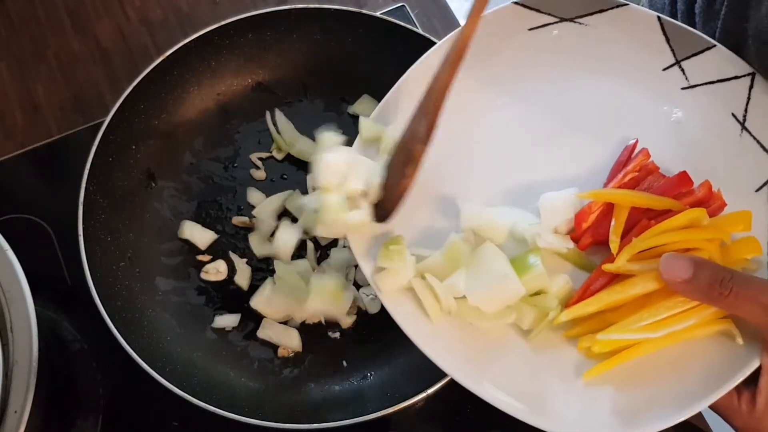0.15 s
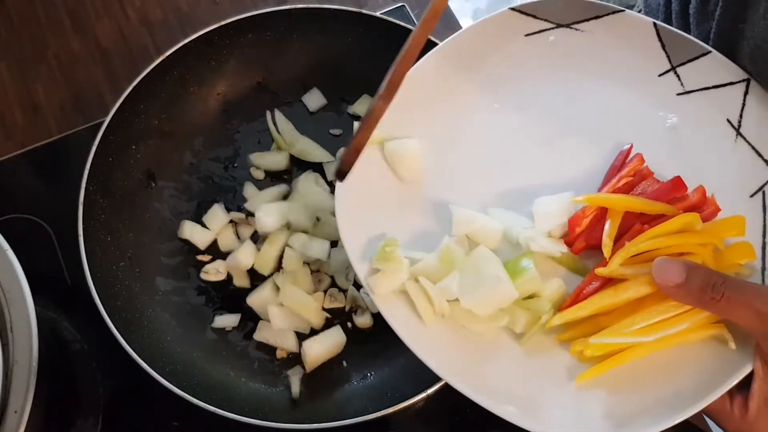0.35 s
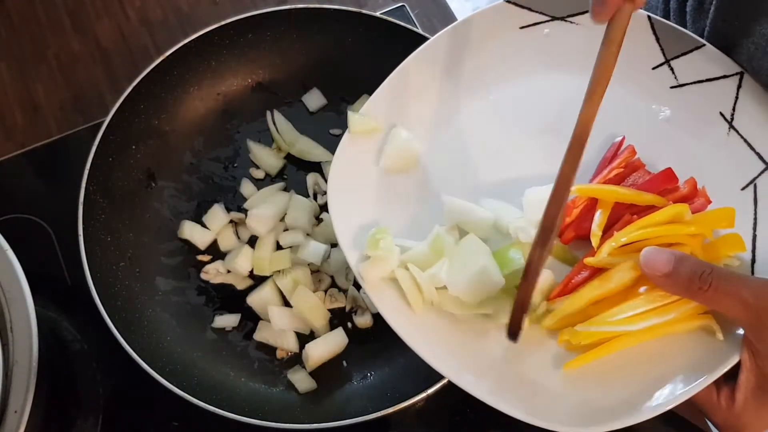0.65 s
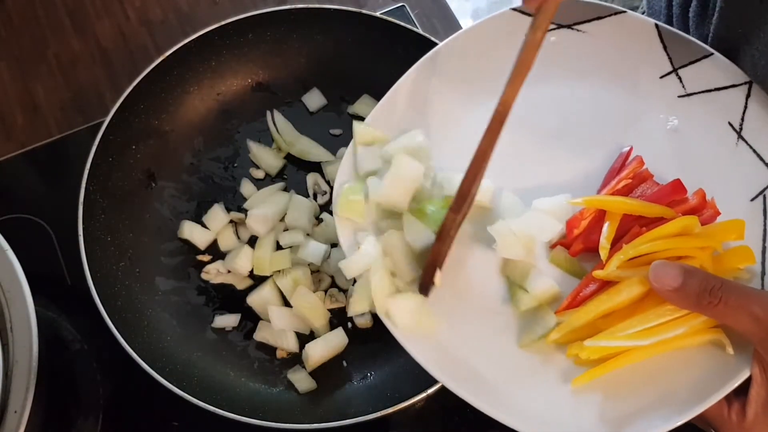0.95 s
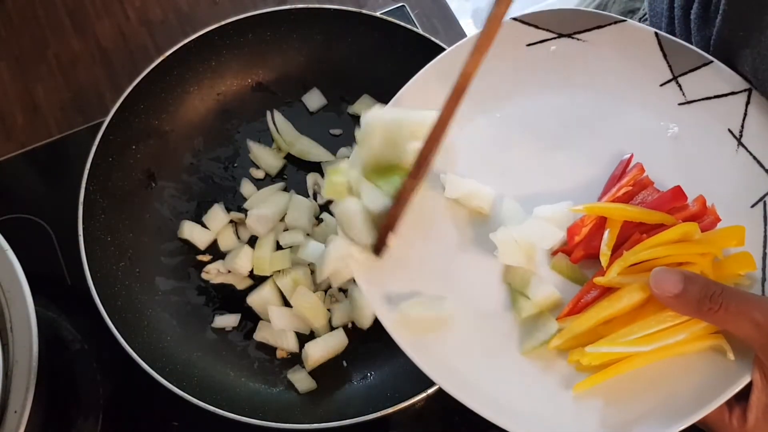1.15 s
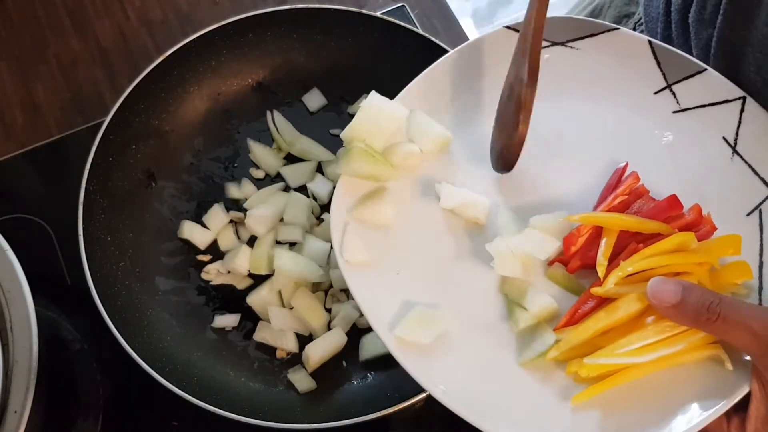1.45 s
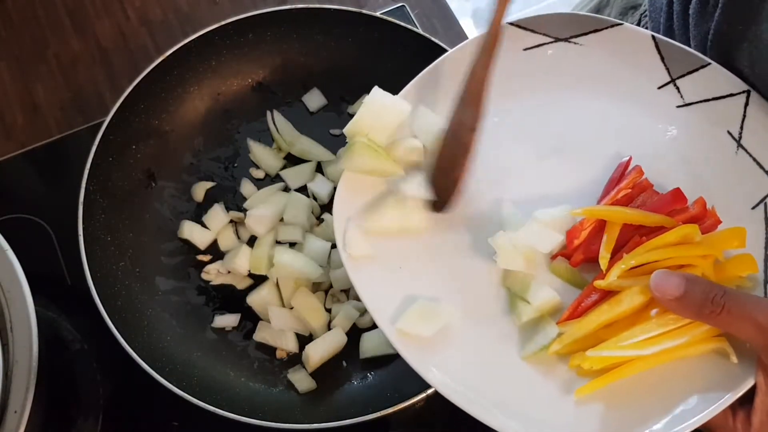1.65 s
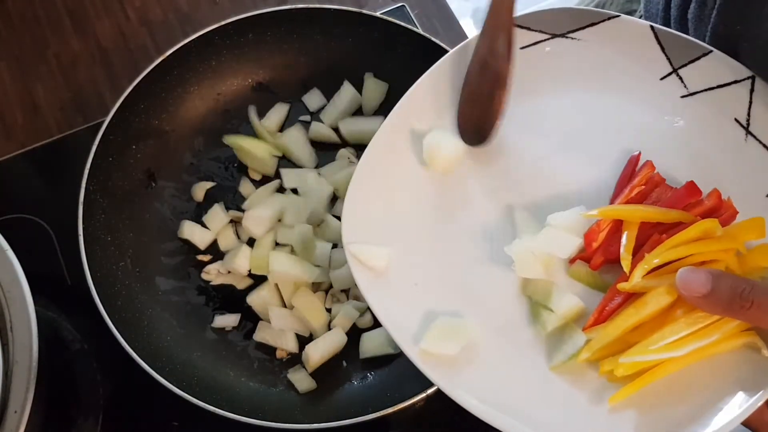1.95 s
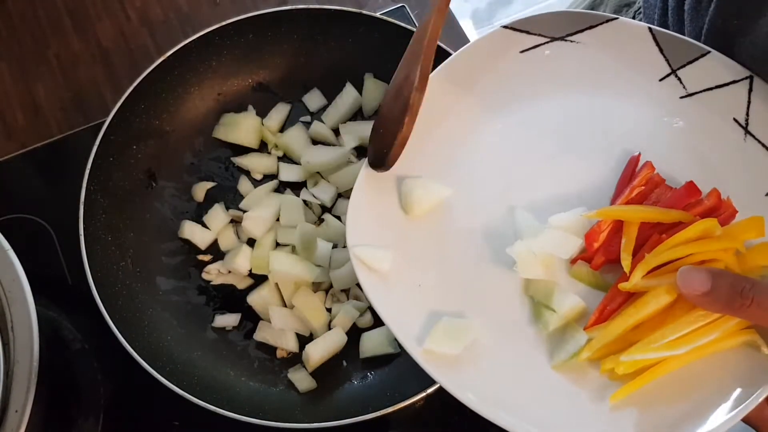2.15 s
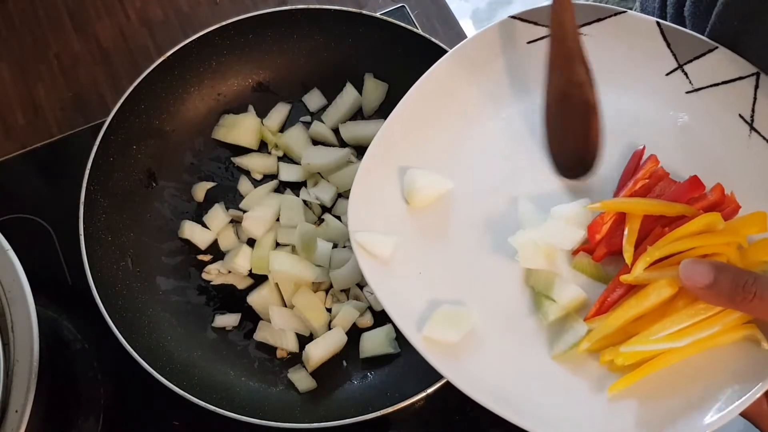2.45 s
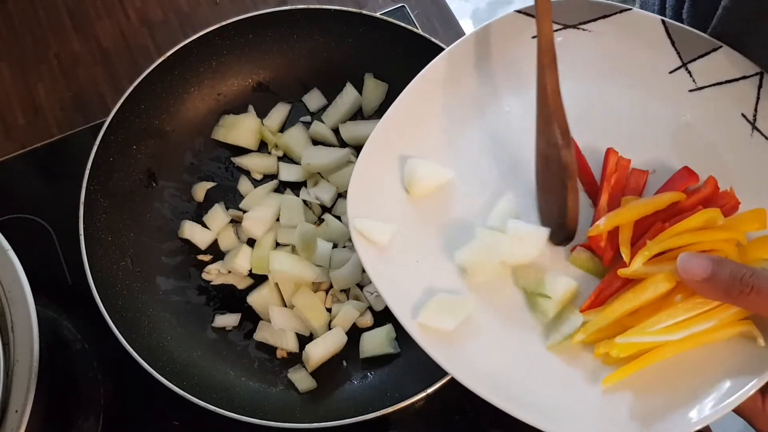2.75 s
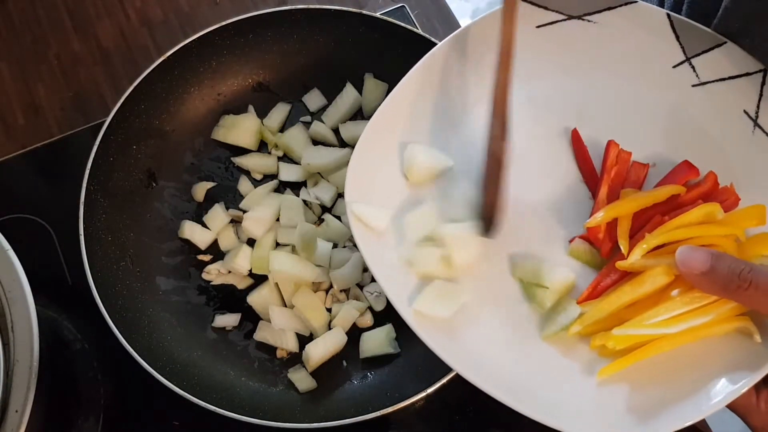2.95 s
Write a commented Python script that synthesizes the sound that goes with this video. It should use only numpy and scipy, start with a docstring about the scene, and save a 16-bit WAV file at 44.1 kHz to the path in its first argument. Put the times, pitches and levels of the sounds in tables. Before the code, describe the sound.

Garlic sizzles in oil, close in a small kitchen over faint low rumble. Onion rustles off a china plate and thuds softly at 0.1-0.3 s, with a dull spatula knock at 0.28, again around 1.1-1.4 and 1.9 s. Spits burst throughout as the sizzle grows. Dry wood-on-china clacks hit at 0.73, 1.46, 1.98 and 2.31 s, the last after a brief skid; short wet scrapes come near 2.1 and 2.6 s.

```python
"""Garlic sizzles in oil close by in a small kitchen, over low rumble: noise, bubble grains and pops.
Diced onion tumbles off a china plate (soft grains) and thuds into the pan, with one dull spatula knock
on the plate early on (damped modes, noise pats). The oil spits in decaying grain clouds; the sizzle grows.
A wooden spatula scrapes wetly (grain strokes) and gives the plate four clear knocks (wood and china
modes, noise cracks), skidding on it just before the last."""
import sys
import numpy as np
from scipy import signal
from scipy.fft import rfft, irfft, next_fast_len
from scipy.io import wavfile
from scipy.ndimage import uniform_filter1d, map_coordinates

SR = 44100
rng = np.random.default_rng(int(sys.argv[2]) if len(sys.argv) > 2 else 0)


def unload_wav(signal):
    """Save mono or channel-first audio to the path in sys.argv[1] as 16-bit WAV at rate SR, clipped to [-1, 1]."""
    wavfile.write(
        sys.argv[1],
        SR,
        np.round(np.clip(np.atleast_2d(signal).T, -1, 1) * 32767).astype(np.int16),
    )


N = 136710

# left-right correlation: freq_hz, correlation
EAR_LIKENESS = [(300, 0.3), (1500, 0), (4000, 0), (9000, 0), (15000, 0.18)]
# spectrum of spits and fat pops: freq_hz, gain_db
SPIT_SPECTRUM = [(500, -42), (2000, -11), (4000, -0.5), (7000, 1.5), (11000, 7), (15500, 1)]
# spectrum of wood on china: freq_hz, gain_db
CRACK_SPECTRUM = [(150, -41), (450, 1), (900, 3.5), (1400, -0.5), (2900, -2), (4000, -11.5), (6000, -17),
                  (8000, -46), (12000, -44)]
# room tail relative to the direct sound
KNOCK_ROOM_DB, THUD_ROOM_DB, SPIT_ROOM_DB = -12, -9, -4.5


def amp(db):
    """Decibels to gain."""
    return 10 ** (np.asarray(db) / 20)


def unit(x):
    """Scaled to rms 1."""
    return x / np.sqrt(np.mean(x ** 2) + 1e-20)


def along(points, hz):
    """(freq_hz, value) points read on a log frequency axis."""
    f, v = np.transpose(points)
    return np.interp(np.log(hz + 1), np.log(f + 1), v)


def curve(rows):
    """(time_s, value) points read at every sample."""
    return np.interp(np.arange(N) / SR, *np.transpose(rows))


def wobble(knots_per_s):
    """Smooth random curve through normal knots."""
    knots = rng.standard_normal(int(N * knots_per_s / SR) + 4)
    return map_coordinates(knots, [np.arange(N) * knots_per_s / SR])


def filtered(x, response):
    """x through a frequency response."""
    m = next_fast_len(N + SR // 2)
    return irfft(rfft(x, m) * response(np.fft.rfftfreq(m, 1 / SR)), m)[..., :N]


def stereo(pair, colour, alike):
    """Two unrelated signals, coloured and blended to a set left-right correlation, rms 1."""
    def mid_side_response(hz):
        angle = np.arccos(np.clip(along(alike, hz), -1, 1)) / 2
        return amp(along(colour, hz)) * [np.cos(angle), np.sin(angle)]

    mid, side = filtered(pair, mid_side_response)
    return unit(np.array([mid + side, mid - side]))


def white():
    """Two unrelated white noises."""
    return rng.standard_normal((2, N))


def pan(db):
    """Left and right gains for a left-minus-right level."""
    return amp([[db / 2], [-db / 2]])


def since(s):
    """Time since s, zero before it."""
    return np.maximum(np.arange(N) / SR - s, 0)


def stroke(s, length_s, power):
    """Half-sine hump over warped time: power below 1 peaks early."""
    return np.sin(np.pi * np.minimum(since(s) / length_s, 1) ** power)


def fade(t, t60_s, attack_s):
    """Exponential decay with an exponential onset."""
    return np.exp(-np.log(1000) * t / t60_s) * (1 - np.exp(-t / attack_s))


def ring(t, hz, t60_s, attack_s):
    """One damped mode."""
    return np.sin(2 * np.pi * hz * t) * fade(t, t60_s, attack_s)


def add(out, s, x):
    """Mixes x into out from time s."""
    i = max(round(s * SR), 0)
    out[..., i:i + x.shape[-1]] += x[..., :N - i]


def room(x, wet_db):
    """x plus a diffuse kitchen tail, each frequency dying at its own rate."""
    # decay time: freq_hz, t60_s
    decay = [(100, 0.36), (600, 0.47), (2500, 0.4), (10000, 0.081)]
    # tail spectrum: freq_hz, gain_db
    tail_spectrum = [(600, 0), (1400, -2), (2600, -3), (6000, 0.5)]
    hz, t, z = signal.stft(rng.standard_normal((2, SR * 2 // 3)), SR, nperseg=256)
    z = z * amp(along(tail_spectrum, hz))[:, None]
    z = z * fade(t, along(decay, hz)[:, None], 0.0014)
    a, b = signal.istft(z, SR, nperseg=256)[1]
    tail = np.array([a + 0.59 * b, a - 0.93 * b])
    tail = tail / np.linalg.norm(tail[0])
    return x + amp(wet_db) * signal.fftconvolve(x, tail, axes=1)[:, :N]


def nearby(x, count=10):
    """Pan, hob and counter return weak early copies, different for each ear."""
    echoes_db, latest_s = -14.5, 0.013
    echo = np.zeros((2, SR // 10))
    for ear in echo:
        at = (rng.uniform(0.14, 1, count) * latest_s * SR).astype(int)
        ear[at] = amp(echoes_db) * rng.choice([-1, 1], count) / np.sqrt(count)
    return x + signal.fftconvolve(x * np.ones((2, 1)), echo, axes=1)[:, :N]


def bubbles(per_s, spread_db, life_s, size=128):
    """Bursting bubbles: decaying noise grains at random times, of log-spread strength."""
    when, strength = rng.random((int(per_s * N / SR), 2)).T
    gain = amp(-spread_db * np.log(strength + 0.012))
    at = ((when * N).astype(int)[:, None] + np.arange(size)).ravel()
    shape = gain[:, None] * np.exp(-np.arange(size) / SR / life_s)

    def grains():
        return np.bincount(at, (shape * rng.standard_normal(shape.shape)).ravel(), N)[:N]

    return np.array([grains() for ear in range(2)])


def patchy(x, depth_db):
    """x with each band swelling and sinking on its own, rms 1."""
    z = signal.stft(x, nperseg=256)[2]
    field = uniform_filter1d(rng.standard_normal(z.shape[1:]), size=12, axis=0)
    field = uniform_filter1d(field, size=9, axis=1)
    return unit(signal.istft(z * amp(depth_db * unit(field)), nperseg=256)[1][:, :N])


def rumble():
    """Low kitchen background: coloured noise of varying level."""
    # time_s, level_db
    level = [(0, -53.5), (.7, -56.5), (.85, -58), (1.7, -53.5), (2.45, -57.5), (2.62, -72), (2.8, -55.5),
             (3.1, -60)]
    # freq_hz, gain_db
    spectrum = [(20, -12), (40, -7.5), (57, 0), (73, -22), (97, 2), (130, -17.5), (200, -27.5), (400, -24),
                (1000, -26), (3000, -51)]
    return amp(curve(level)) * stereo(white(), spectrum, [(60, 1.0)])


def sizzle():
    """Steam hiss, sputtering bubbles and sharp pops of fat follow the strength of the frying."""
    # frying strength: time_s, level_db
    strength = [(0.0, -46), (0.18, -43), (0.36, -42), (0.92, -42.5), (1.32, -40), (1.82, -40),
                (2.17, -38.5), (3.1, -39.5)]
    # freq_hz, gain_db
    spectrum = [(180, -55), (300, -33.5), (554, -16), (723, -13.5), (882, -18), (1470, -7), (1830, -12.5),
                (2550, -5.5), (3380, -6), (11900, -1.5), (15800, -4.5)]
    hiss_db, bubbles_db, pops_db = 0.67, -1.85, -11
    sputter_db, flutter_db, left_right_db = 1.3, 0.68, 1.5
    hiss = amp(hiss_db) * stereo(white(), spectrum, EAR_LIKENESS)
    grains = bubbles(per_s=2600, spread_db=-1, life_s=0.001)
    crackle = amp(bubbles_db) * stereo(grains, spectrum, EAR_LIKENESS)
    pop_grains = bubbles(per_s=120, spread_db=3.4, life_s=0.00076)
    pops = amp(pops_db) * stereo(pop_grains, SPIT_SPECTRUM, EAR_LIKENESS)
    oil = hiss + crackle
    sputtering = oil.std() * patchy(oil, sputter_db)
    level = amp(curve(strength) + flutter_db * wobble(knots_per_s=45.04))
    return level * (sputtering + pops) * pan(left_right_db)


def tumbles():
    """The onion heap rolls over the plate's rim: a soft rustle of many small bumps."""
    # start_s, length_s, level_db
    falls = [(0.115, 0.33, -54), (1.107, 0.61, -59), (1.603, 0.68, -59.5), (1.857, 0.19, -45),
             (2.017, 0.66, -64.5)]
    # freq_hz, gain_db
    spectrum = [(50, -8), (110, 6), (200, -1.5), (300, 0.5), (400, -0.5), (520, 1.5), (700, 1), (1100, -14),
                (2200, -9.5), (6000, -42)]
    env = sum(amp(db) * stroke(s, length_s, 0.5) for s, length_s, db in falls)
    bumps = stereo(bubbles(per_s=1200, spread_db=1.0, life_s=0.0014), spectrum, [(300, 0.59)])
    return room(env * bumps, THUD_ROOM_DB)


def thuds():
    """Onion lands, and one dull spatula knock on the plate, with a hollow pat and low boom."""
    # thuds, the one at 0.282 s being the dull knock: start_s, boom_db, pat_db, pat_attack_s
    hits = [(0.125, -49, -36.5, 0.0027), (0.186, -28.5, -39.5, .005), (0.282, -29.5, -28, 0.0016),
            (0.315, -31, -50, .004), (1.135, -41.5, -60, .005), (1.253, -37, -50, 0.0059),
            (1.335, -47, -39, .004), (1.386, -40.5, -58, .005), (1.868, -31, -35, 0.0056),
            (1.899, -24.5, -36.5, 0.0061), (1.976, -30, -62, .005)]
    # low boom: nominal_hz, level_db, t60_s
    boom_modes = [(58.27, -13.5, 1.2), (84.7, -8, 0.57), (119, 0.5, 0.17), (134, -10, 0.17),
                  (178, -11, 0.036), (223.3, -20, 0.27)]
    # hollow ring under each pat: freq_hz, level_db, t60_s
    pat_modes = [(384.1, -6.5, 0.14), (425.5, -4, 0.074), (593.4, -9, 0.11), (1215, -9, 0.065)]
    # pat noise: freq_hz, gain_db
    pat_spectrum = [(100, 0), (270, -18), (420, -3), (600, -1), (900, -7.5), (1250, -6.5), (1800, -20.5),
                    (6000, -26)]
    boom_attack_s, pat_t60_s = 0.0067, 0.05
    tones, t = np.zeros(N), np.arange(SR) / SR
    for s, boom_db, pat_db, attack_s in hits:
        for hz, level_db, t60_s in boom_modes:
            shifted_hz = hz * rng.normal(1, 0.025)
            add(tones, s, amp(boom_db + level_db) * ring(t, shifted_hz, t60_s, boom_attack_s))
        for hz, level_db, t60_s in pat_modes:
            add(tones, s, amp(pat_db + level_db) * ring(t, hz, t60_s, attack_s))
    pat_env = sum(amp(db) * fade(since(s), pat_t60_s, attack_s) for s, _, db, attack_s in hits)
    pats = pat_env * stereo(white(), pat_spectrum, [(300, 0.55)])
    return room(tones * pan(0.85) + pats, THUD_ROOM_DB)


def spits():
    """Wet onion meets hot oil: sudden clouds of bubbles that die away."""
    # start_s, level_db, t60_s
    bursts = [(0.176, -37, 0.046), (0.19, -27.5, 0.055), (0.354, -28, 0.04), (0.386, -37.5, 0.96),
              (0.509, -36, 0.13), (1.042, -35.5, 0.16), (1.098, -23.5, 0.032), (1.458, -30, .03),
              (1.4875, -24.5, 0.044), (1.597, -27, 0.014), (1.679, -32, 0.055), (1.872, -32, 0.18),
              (2.0397, -20.5, 0.015), (2.133, -20, 0.022), (2.167, -29.5, 0.084), (2.242, -26, 0.028),
              (2.292, -25.5, 0.07), (2.508, -30, 0.084), (2.686, -25, .012), (2.778, -32.5, 0.026),
              (2.963, -27.5, 0.03)]
    power = sum((amp(db) * fade(since(s), t60_s, 0.00018)) ** 2 for s, db, t60_s in bursts)
    grains = bubbles(per_s=12000, spread_db=1.7, life_s=0.00011)
    cloud = stereo(grains, SPIT_SPECTRUM, EAR_LIKENESS)
    return room(np.sqrt(power) * cloud * pan(3.4), SPIT_ROOM_DB)


def scrapes():
    """Spatula and wet onion slide over the glaze in short gritty strokes."""
    # start_s, length_s, level_db
    strokes = [(0.624, 0.016, -43), (1.246, 0.041, -46), (2.11, 0.026, -41), (2.154, 0.047, -39),
               (2.562, 0.018, -37), (2.586, 0.021, -35.5), (2.643, 0.017, -32)]
    # freq_hz, gain_db
    spectrum = [(400, -22.5), (1500, -13), (2700, 1.5), (5500, 3), (8000, 0.5), (15000, -55)]
    env = sum(amp(db) * stroke(s, length_s, 0.4) for s, length_s, db in strokes)
    grit = stereo(bubbles(per_s=4000, spread_db=0.96, life_s=0.00064), spectrum, EAR_LIKENESS)
    return room(env * grit * pan(0.8), SPIT_ROOM_DB)


def knocks():
    """Blows clack dry wood and ping plate modes, damped by contact, with a faint uneven free ring."""
    # the spot struck sets the mode levels, the grip the free ring:
    # start_s, clack_db, crack_db, free_ring_db, left_right_db, then level_db of each plate mode, low to high
    blows = [(0.7296, -24.5, -19.5, -8.5, -0.5, -26, -50, -56, -20, 0),
             (1.4642, -17, -17.5, -2, 2.5, -23.5, -8.5, -31, -4, -4),
             (1.9753, -13, -17.5, -0.5, 0, -22, -15, -23, -22, -26),
             (2.3111, -18, -19.5, 3, 0, -15, -40, -32, -9.5, -13)]
    # plate modes: freq_hz, touched_t60_s, free_t60_s, free_ring_db
    plate_modes = [(617, 0.043, 0.21, -23.5), (1549, 0.045, 0.28, -20), (2223, 0.092, 0.18, -11),
                   (2532, 0.038, 0.14, -22), (2586, 0.036, 0.33, -26)]
    # wooden clack of spatula and plate: freq_hz, level_db, t60_s
    clack_modes = [(422, -15, 0.031), (612, -4.5, 0.03), (735, -15.5, 0.016), (954, -14, 0.014),
                   (1097, -8, 0.024), (1176, -3.5, 0.02), (1370, -1, 0.014), (1818, -12.5, 0.043),
                   (1990, -25, 0.025), (2740, -19, 0.052), (3780, -25, 0.11), (4010, -37, 0.045)]
    clack_attack_s, plate_attack_s, crack_t60_s = 0.00023, 0.006, 0.046
    ear_spread_db = 2  # each wood mode reaches each ear differently
    left_lead_s = 7e-5  # the plate is nearer the left ear
    low_cut_hz = 490  # the plate radiates little bass
    out, t = np.zeros((2, N)), np.arange(SR // 2) / SR
    crack = stereo(white(), CRACK_SPECTRUM, [(500, 0.39), (1200, 0.017), (5000, 0.027)])
    for s, clack_db, crack_db, ring_db, left_right_db, *mode_dbs in blows:
        wood, china = np.zeros((2, 2, N))
        for hz, level_db, t60_s in clack_modes:
            ears = amp(ear_spread_db * rng.standard_normal((2, 1)))
            add(wood, s, -amp(clack_db + level_db) * ears * ring(t, hz, t60_s, clack_attack_s))
        for level_db, (hz, touched_t60_s, free_t60_s, free_db) in zip(mode_dbs, plate_modes):
            rattle = np.array([wobble(knots_per_s=90)[:len(t)] for ear in range(2)])
            ping = ring(t, hz, touched_t60_s, plate_attack_s)
            tail = amp(free_db + ring_db) * rattle * ring(t, hz, free_t60_s, plate_attack_s)
            add(china, s, -amp(level_db) * (ping + tail))
        clack = nearby(wood) + amp(crack_db) * fade(since(s), crack_t60_s, 0.00016) * crack
        blow = room(clack, KNOCK_ROOM_DB) + room(china, KNOCK_ROOM_DB + ring_db)
        out += blow * pan(left_right_db)
    thin = signal.butter(2, low_cut_hz, "high", fs=SR, output="sos")
    # half the lead forward on the left, half back on the right
    return filtered(signal.sosfilt(thin, out),
                    lambda hz: np.exp(1j * np.pi * left_lead_s * np.array([hz, -hz])))


def skid():
    """Wood chatters briefly over the china just before the last blow, coloured like a knock."""
    # start_s, length_s, level_db
    s, length_s, db = (2.287, .026, -33)
    env = amp(db) * np.sqrt(np.abs(stroke(s, length_s, 1)))
    grains = bubbles(per_s=2800, spread_db=1, life_s=0.0007)
    return env * stereo(grains, CRACK_SPECTRUM, [(500, 0.92)])


def scene():
    """Sum of all sounds at the stove."""
    return rumble() + sizzle() + tumbles() + thuds() + spits() + scrapes() + knocks() + skid()


def record(dry):
    """Rolls off the deepest bass and removes everything from the band limit up."""
    top_hz, low_cut_hz = 16050, 35.6
    return filtered(dry, lambda hz: (hz < top_hz) * hz ** 4 / (hz ** 4 + low_cut_hz ** 4))


dry = scene()
out = record(dry)
unload_wav(out)
```